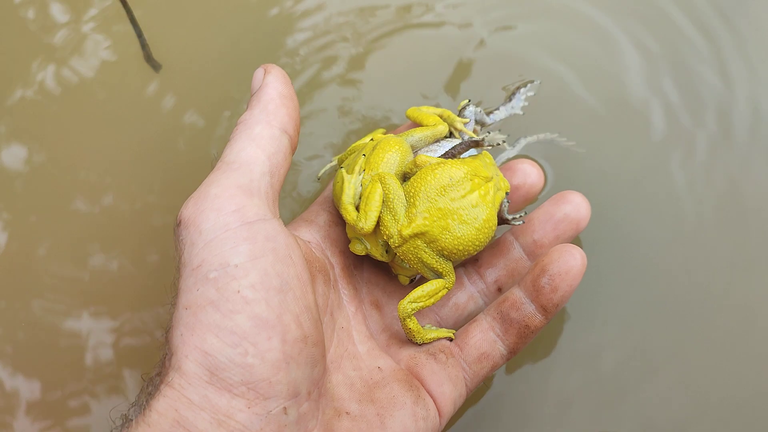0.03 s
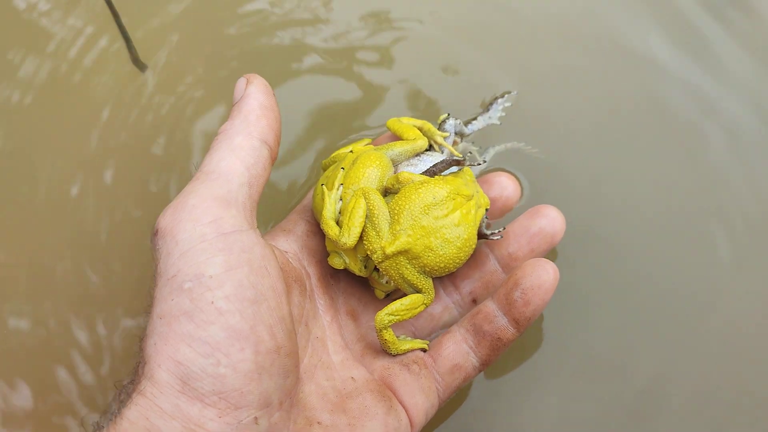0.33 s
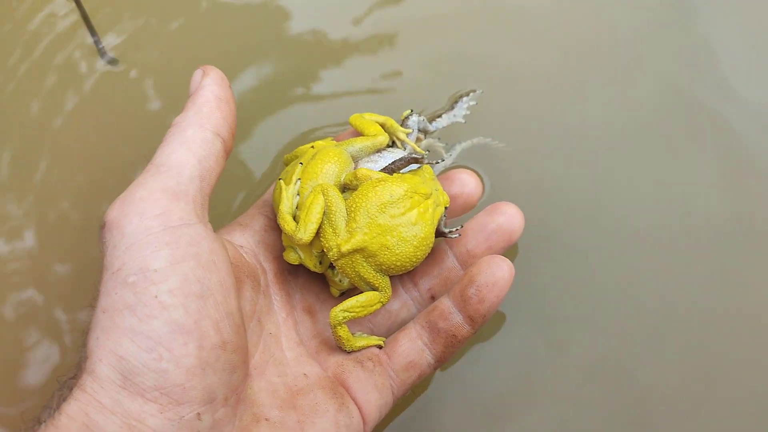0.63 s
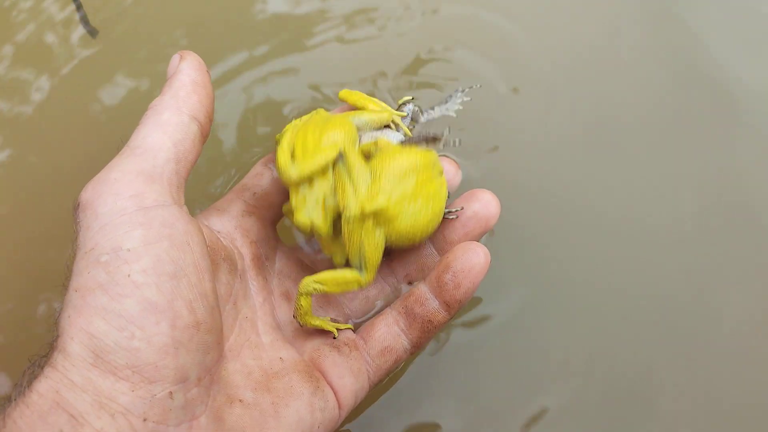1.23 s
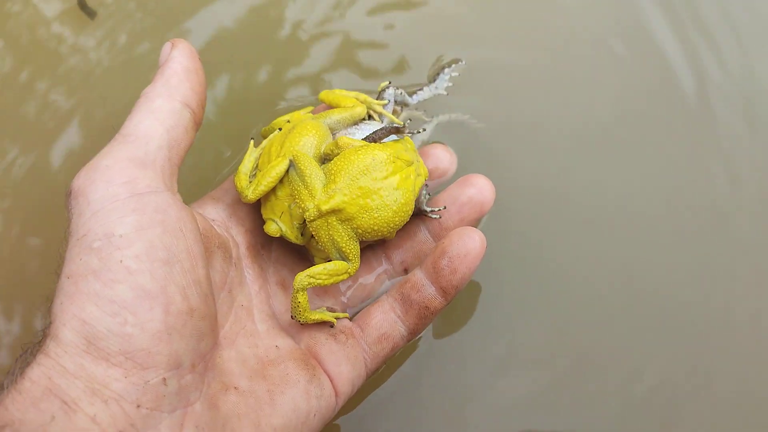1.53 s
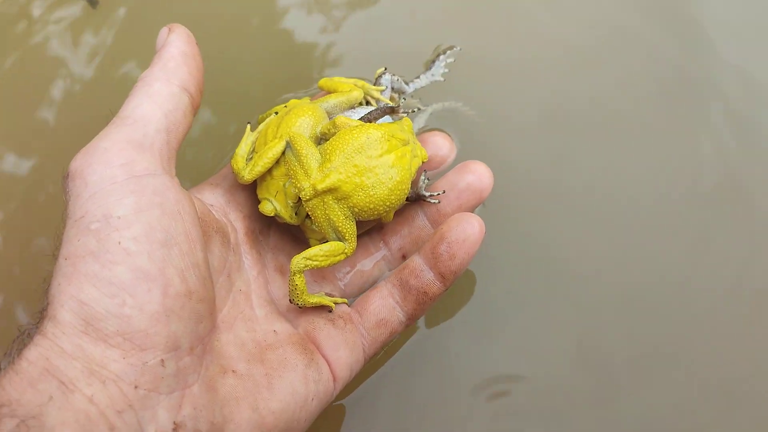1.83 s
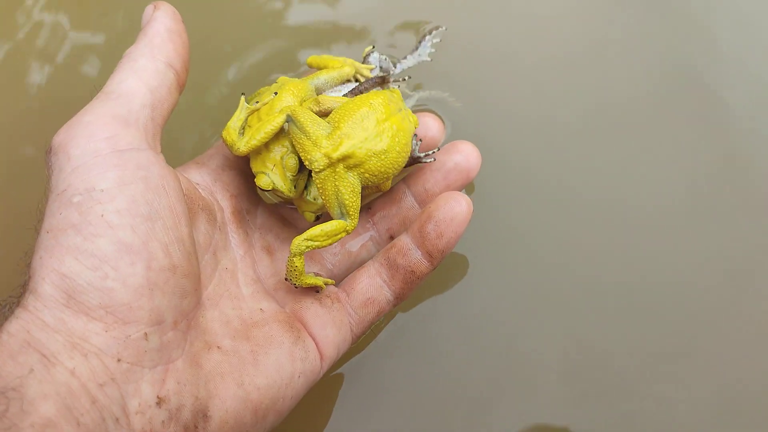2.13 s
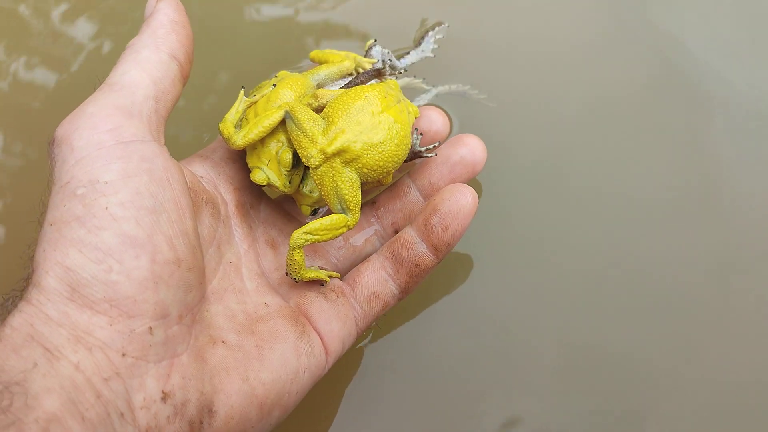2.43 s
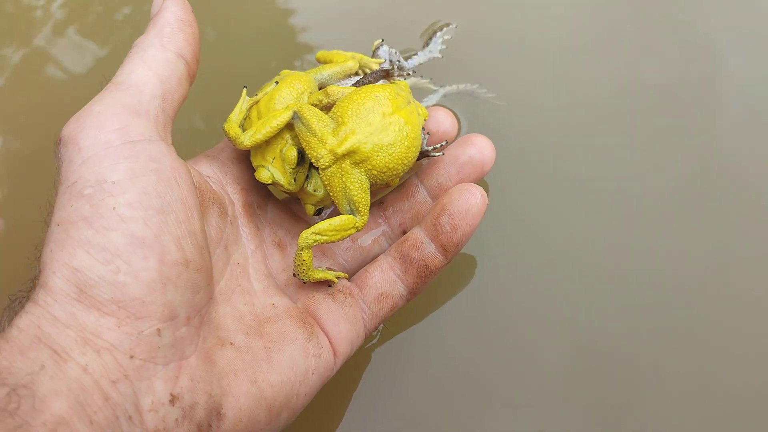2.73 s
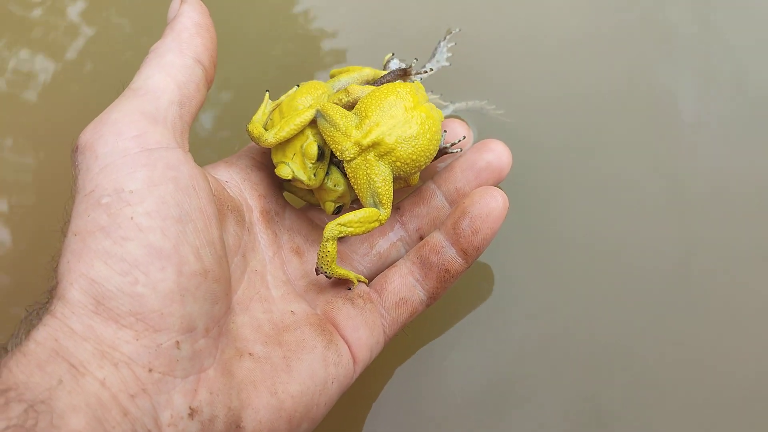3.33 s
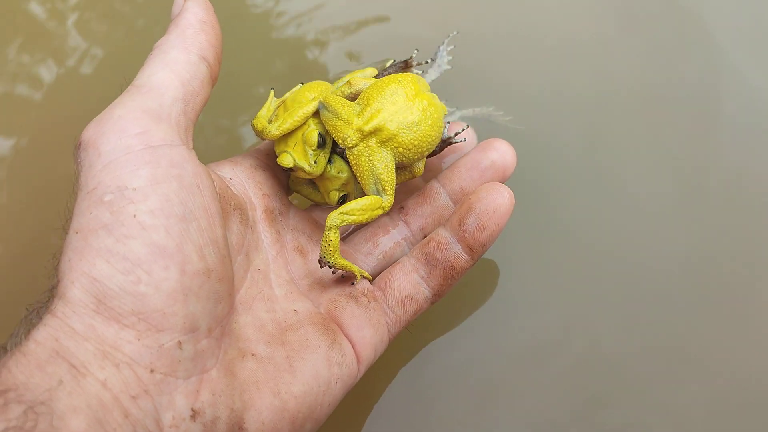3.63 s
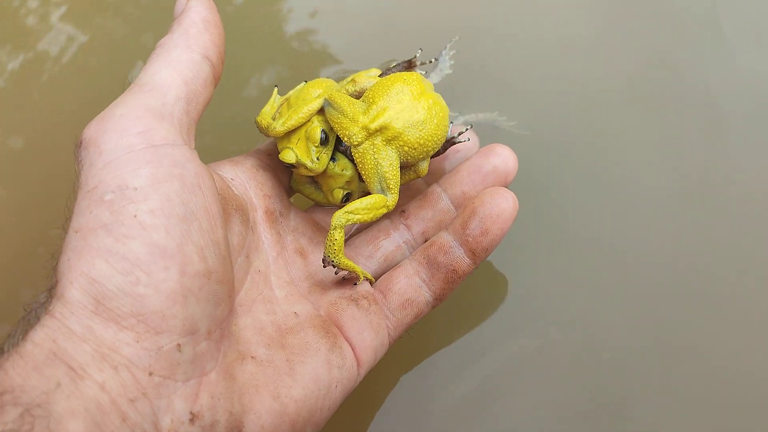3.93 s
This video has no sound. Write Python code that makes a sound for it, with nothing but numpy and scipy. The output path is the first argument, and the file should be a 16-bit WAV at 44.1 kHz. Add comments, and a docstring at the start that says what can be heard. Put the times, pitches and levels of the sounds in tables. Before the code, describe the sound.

A trilling toad chorus fades in outdoors by the water. Handled toads chirp and squeak briefly, a nearby toad takes over with repeated trills, then the raspy chirps return beside a softer caller. Insects pulse faintly behind.

```python
"""Toads at a muddy pond. A faint rumble, two high insects and far toads fade in as a low-voiced toad
trills: larynx puffs drive its vocal sac. From 0.35 to 0.9 s a clump of toads held in a hand gives harsh
release chirps and squeaks; a muffled toad joins and calls on and off. A near toad takes over at 0.8 s,
with one faint bump at 1.6 s. The held toads resume at 2.7 s, and the near toad's neighbour trills
from 2.8 s to the end."""
import sys
import numpy as np
from scipy import signal
from scipy.fft import rfft, irfft
from scipy.io import wavfile
from scipy.ndimage import uniform_filter1d

SR = 44100
rng = np.random.default_rng(int(sys.argv[2]) if len(sys.argv) > 2 else 0)


def store_wav(level_fs):
    """Save 16-bit WAV to argv[1]."""
    pcm = np.round(np.clip(np.atleast_2d(level_fs), -1, 1) * 32767)
    wavfile.write(sys.argv[1], SR, pcm.T.astype(np.int16))


N = 176400
T = np.arange(800) / SR  # time within a pulse

# Background spectrum: freq_hz, gain_db
AIR_SPECTRUM = [(20, 4), (150, -9.5), (400, -14.5), (900, -14), (1900, -7), (3000, -23), (5000, -25.5),
                (6600, -23.5), (8100, -30), (8800, -18), (9500, -18), (10000, -39), (15000, -38)]
# Soft knock: start_s, pitch_hz, level_db, length_s
BUMP = (1.57, 170, -54, 0.13)
# Insects: first_s, period_s, top_hz, fall_hz, length_s, level_db, side_db (left minus right)
INSECTS = [(0.147, .101, 9520, 820, .046, -47, -7), (0.169, .1033, 9200, 700, .046, -52, -4.5)]
# Far toads' envelope: time_s, level_db
CHORUS_LEVEL = [(.17, -65), (.195, -31), (.5, -28), (1.55, -25), (1.72, -28), (1.75, -41), (1.8, -31),
                (2.40, -31), (2.425, -43), (2.45, -45), (2.52, -30.5), (2.9, -25), (3.25, -27.5), (4, -28)]
# Held toads' chirps: start_s, pulse_count, level_db
RELEASE_CHIRPS = [ (.351, 2, -10), (.366, 2, -8), (.383, 3, -11), (.410, 1, -9), (.506, 1, -12.5),
                  (.520, 3, -8), (.537, 2, -8), (.664, 2, -7.5), (.677, 3, -6), (.852, 4, -7.5),
                  (2.699, 3, -10.5), (2.822, 3, -8), (2.845, 2, -9), (2.864, 3, -18), (2.977, 2, -12),
                  (2.996, 3, -11), (3.107, 3, -9.5), (3.126, 2, -9), (3.146, 1, -11), (3.290, 3, -9.5),
                  (3.307, 3, -10.5), (3.436, 3, -8), (3.454, 3, -9), (3.593, 6, -7.5), (3.895, 1, -12),
                  (3.908, 2, -11), (3.926, 2, -10.5)]
# Their rasp: freq_hz, gain_db
RASP_SPECTRUM = [(100, -10), (200, 1.5), (350, -3), (650, 6.5), (1300, 15.5), (2600, 7.5), (3500, 1.5),
                 (5200, 0), (7500, -11), (10500, -22.5), (12700, -8.5), (14500, -19.5)]
# Their squeaks: start_s, level_db, pitch_hz
HELD_SQUEAKS = [(.432, -24, 1407), (.886, -21.5, 1442), (3.620, -25.5, 1346), (3.949, -22, 1397)]
# Toad body modes: pitch_ratio, level_db, decay_s, side_db
BODY_MODES = [(0.56, -22, 0.0014, -1), (0.82, -15, 0.0014, -3), (1.2, -16, 0.0016, 2), (1.4, -28, .0017, 1),
              (1.72, -32, 0.0019, 2), (2.35, -33, .0014, 0)]
# Trill filter: freq_hz, gain_db
TRILL_SPECTRUM = [(200, -23), (600, -14), (1000, -2.5), (2000, -0.5), (4000, -1), (4800, -5.5),
                  (14000, -14)]
# Voice per toad: swell_db, base_hz, overtone_db, pulse_s, side_db, left_lead_rad
VOICES = { "low": (1, 1690, -24, .003, -5, -1.0), "near": (1.5, 1870, -15, .004, -7, 2.2),
          "neighbour": (1, 1790, -5, .0034, -1, -2.1), "muffled": (0, 1790, -30, .0036, -3.5, 1.5)}
# Calls: toad, start_s, run_start_s, close_start_s, level_db
TRILLS = [ ("low", .108, .108, .135, -12.5), ("low", .236, .266, .423, -9), ("low", .520, .558, .732, -10),
          ("near", .769, .806, 1.161, -12.5), ("near", 1.251, 1.286, 1.649, -8.5),
          ("near", 1.776, 1.813, 2.003, -7.5), ("near", 2.102, 2.142, 2.341, -6),
          ("near", 2.455, 2.491, 2.788, -6.5), ("neighbour", 2.830, 2.859, 2.941, -16),
          ("neighbour", 3.032, 3.056, 3.191, -16), ("neighbour", 3.273, 3.298, 3.428, -16),
          ("neighbour", 3.516, 3.541, 3.673, -17), ("neighbour", 3.764, 3.788, 3.922, -16.5),
          ("muffled", .455, .478, .70, -18), ("muffled", .745, .78, 1.09, -14.5),
          ("muffled", 1.199, 1.222, 1.50, -14.5), ("muffled", 2.051, 2.081, 2.385, -23),
          ("muffled", 2.65, 2.68, 2.92, -17), ("muffled", 2.98, 3.01, 3.22, -20.5),
          ("muffled", 3.44, 3.47, 3.705, -21), ("muffled", 3.757, 3.787, 3.96, -22)]
# Overall envelope: time_s, gain_db
FADE_IN = [(.09, -70), (.108, -16), (.2, -10.5), (.28, -5.5)]

BODY_RISE_S, OVERTONE_LEAD_RAD = .0008, 1.3


def amp(db):
    """Decibels to gain."""
    return 10 ** (np.asarray(db) / 20)


def unit(x):
    """Scale to rms 1."""
    return x / np.sqrt(np.mean(x ** 2) + 1e-20)


def level(points):
    """Gain curve from time_s, gain_db points."""
    return amp(np.interp(np.arange(N) / SR, *np.transpose(points)))


def colour(x, points):
    """Filter by freq_hz, gain_db points."""
    hz, db = np.transpose(points)
    log_hz = np.log(np.fft.rfftfreq(N, 1 / SR) + 1)
    return irfft(rfft(x) * amp(np.interp(log_hz, np.log(hz), db)), N)


def add(mix, start_s, sound):
    """Mix in a stereo sound."""
    at = round(start_s * SR)
    sound = sound[:, max(-at, 0):]
    part = mix[:, max(at, 0):][:, :sound.shape[1]]
    part += sound[:, :part.shape[1]]


def tone(hz, side_db=0, lead_rad=0):
    """Stereo sine on a pitch curve."""
    angle = 2 * np.pi * np.cumsum(hz) / SR
    return np.array([amp(side_db / 2) * np.sin(angle + lead_rad), amp(-side_db / 2) * np.sin(angle)])


def ring(rise_s, decay_s):
    """Soft attack, exponential decay, peak 1."""
    shape = (1 - np.exp(-T / rise_s)) ** 2 * np.exp(-T / decay_s)
    return shape / shape.max()


def air(level_db=-49, correlation=.54, patch_db=2.5):
    """Low rumble and the blurred hum of distant toads and insects."""
    left, other = rng.standard_normal((2, N))
    right = correlation * left + np.sqrt(1 - correlation ** 2) * other
    spectra = signal.stft([left, right], nperseg=512)[2]
    patches = uniform_filter1d(rng.standard_normal(spectra.shape[1:]), 6, axis=0)
    patches = unit(uniform_filter1d(patches, 8, axis=1))
    noise = signal.istft(spectra * amp(patch_db * patches), nperseg=512)[1][:, :N]
    return amp(level_db) * unit(colour(noise, AIR_SPECTRUM))


def bump():
    """Dull knock: a low tone and its sagging octave."""
    start_s, hz, db, length_s = BUMP
    out, u = np.zeros((2, N)), np.arange(0, 1, 1 / (length_s * SR))
    partials = tone(np.full(len(u), hz)) + .5 * tone(2 * hz * (1 - .22 * u))
    add(out, start_s, amp(db) * np.sin(np.pi * u ** .5) ** 2 * partials)
    return out


def insects(waver_hz=60, roughness=.3, jitter_s=.002):
    """High, rough, falling chirps, about ten a second each."""
    out = np.zeros((2, N))
    for first_s, period_s, top_hz, fall_hz, length_s, db, side_db in INSECTS:
        u = np.arange(0, 1, 1 / (length_s * SR))
        for s in np.arange(first_s, N / SR, period_s):
            scrape = unit(uniform_filter1d(rng.standard_normal(len(u)), 90))
            glide_hz = top_hz - fall_hz * u ** 2.7 + waver_hz * scrape
            shape = np.sin(np.pi * u ** 1.5) ** 2 * (1 + roughness * scrape[::-1])
            chirp = shape * tone(glide_hz, side_db, 1.3)
            add(out, s + rng.normal(0, jitter_s), amp(db + rng.normal(0, 1.8)) * chirp)
    return out


def bank_echoes(x, gain_db=-11.5, t60_s=.09):
    """Short scatter off the water and banks."""
    t = np.arange(SR // 3) / SR
    taps = rng.standard_normal((2, len(t))) * (rng.random((2, len(t))) < .05)
    taps *= (t > .003) * amp(-60 * t / t60_s)
    taps /= np.linalg.norm(taps, axis=1, keepdims=True)
    return amp(gain_db) * signal.fftconvolve(x, taps, axes=1)[:, :N]


def far_toads(count=4, centre_hz=1810, spread=.04):
    """Each far toad repeats trills around its own pitch."""
    out = np.zeros((2, N))
    for detune in np.linspace(-spread, spread, count):
        s, lead_rad = rng.uniform(-.3, 0), rng.uniform(1, 3)
        while s < N / SR:
            length_s = rng.uniform(.18, .4)
            hz = centre_hz * (1 + detune + rng.normal(0, .01))
            out += trill(s, s + .03, s + length_s, db=rng.normal(0, 2), swell_db=2, hz=hz,
                         overtone_db=-27, pulse_s=.0034, side_db=rng.normal(-1.2, 2.3), lead_rad=lead_rad)
            s += length_s + rng.uniform(.06, .11)
    return unit(colour(out, TRILL_SPECTRUM)) * level(CHORUS_LEVEL)


def squeak(hz, side_db, lead_rad, overtone_db, length_s=.018, fall=.13):
    """Pulses fused into a short falling tone with its octave."""
    u = np.arange(0, 1, 1 / (length_s * SR))
    glide_hz = hz * (1 - fall * u ** 2)
    octave = amp(min(overtone_db + 3, -7)) * tone(2 * glide_hz, -2, OVERTONE_LEAD_RAD)
    return np.sin(np.pi * u) * (tone(glide_hz, side_db, lead_rad) + octave)


def held_toads(base_hz=1697, throat_hz=650, gap_s=.0051, peak_s=.0016, lead_rad=1.7):
    """Release chirps: tight, sagging pulses, each with throat ring and rasp; also squeaks."""
    voice, rasp = np.zeros((2, 2, N))
    u = T / peak_s
    shape = (u * np.exp(1 - u)) ** 2.98
    throat = amp(-39) * ring(BODY_RISE_S, .002) * tone(np.full(len(T), throat_hz))
    for start_s, count, db in RELEASE_CHIRPS:
        rasp_db = -21.5 + .62 * db  # grows more slowly than the voice
        for k in range(round(count)):
            s = start_s + k * gap_s + rng.normal(0, .00015)
            glide_hz = base_hz * (1 - .016 * k - .03 * (u - 1))
            add(voice, s, amp(db - 1.07 * k) * (shape * tone(glide_hz, -9.5, lead_rad) + throat))
            puff = (rng.standard_normal((2, len(T))) + rng.standard_normal(len(T))) / 2
            add(rasp, s, amp(rasp_db) * ring(.00034, .0038) * puff)
    for s, db, hz in HELD_SQUEAKS:
        add(voice, s, amp(db) * squeak(hz, -2, lead_rad, overtone_db=-16))
    return voice + colour(rasp, RASP_SPECTRUM)


def larynx_pulse(hz, overtone_db, length_s, side_db, lead_rad, rise_s=.0005, bend=.06):
    """A puff drives the vocal sac and knocks the body; level and pitch sag as it ends."""
    drive = 1 / (1 + (T / length_s) ** 3.3)
    shape = (1 - np.exp(-T / rise_s)) ** 2 * drive
    glide_hz = hz * (1 + bend * drive)
    overtone = tone(glide_hz * 1.925 * rng.normal(1, .01), -2, OVERTONE_LEAD_RAD)
    overtone *= amp(overtone_db) * drive * (1 - np.exp(-T / BODY_RISE_S))
    out = shape * (tone(glide_hz, side_db, lead_rad) + overtone)
    for ratio, db, decay_s, mode_side_db in BODY_MODES:
        mode_hz = np.full(len(T), hz * ratio * rng.normal(1, .03))
        mode = tone(mode_hz, mode_side_db, lead_rad * ratio ** 3 + rng.normal(0, 1))
        out += amp(db) * ring(BODY_RISE_S, decay_s) * mode
    return out


def trill(start_s, run_s, close_s, db, swell_db, hz, overtone_db, pulse_s, side_db, lead_rad,
          run_gap_s=.01435, burst_gap_s=.0062, jitter_s=.0003, climb=.025):
    """One call: opening burst, steady run with a few doubled pulses, closing burst, squeak."""
    out, burst_s = np.zeros((2, N)), np.arange(5) * burst_gap_s
    opening = start_s + burst_s[start_s + burst_s < run_s - 2 * burst_gap_s]
    u = np.linspace(0, 1, max(round((close_s - run_s) / run_gap_s), 1), endpoint=False)
    steady = run_s + (close_s - run_s) * (u + .03 * u * (1 - u))  # hurries slightly
    closing = close_s + burst_s[:3]
    pulses = [(s, 0) for s in [*opening, *steady, *closing]]
    doubles = [(s + burst_gap_s, -4.5) for s in steady[rng.random(len(steady)) < .16]]
    for s, weak_db in pulses + doubles:
        effort = min((s - start_s) / (close_s - start_s), 1)
        late, loud, sharp = rng.standard_normal(3)
        pitch_hz = hz * (1 + climb * effort + .006 * sharp)
        pulse = larynx_pulse(pitch_hz, overtone_db, pulse_s, side_db, lead_rad)
        add(out, s + jitter_s * late, amp(db + weak_db + swell_db * effort + .9 * loud) * pulse)
    tail = squeak(hz * (1 + climb), side_db, lead_rad, overtone_db)
    add(out, closing[-1], amp(db + swell_db - 8) * tail)
    return out


def scene():
    """Toads and their echoes over insects, air and a bump."""
    trills = sum(trill(*call, *VOICES[toad]) for toad, *call in TRILLS)
    toads = colour(trills, TRILL_SPECTRUM) + held_toads() + far_toads()
    return toads + bank_echoes(toads) + insects() + air() + bump()


def record(dry, cutoff_hz=14900):
    """Fade-in and low-pass."""
    lowpass = signal.firwin(511, cutoff_hz, window=("kaiser", 9), fs=SR)
    return signal.oaconvolve(dry * level(FADE_IN), lowpass[None], "same")


dry = scene()
out = record(dry)
store_wav(out)
```